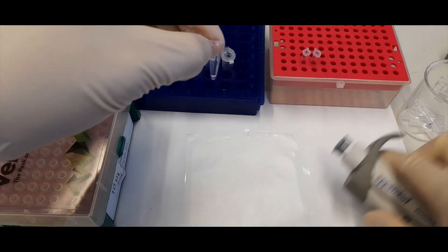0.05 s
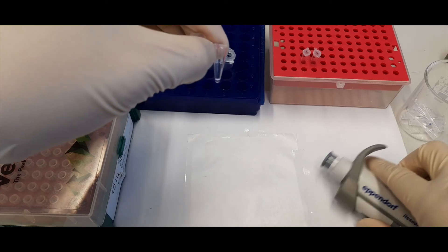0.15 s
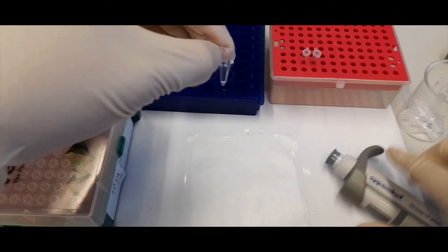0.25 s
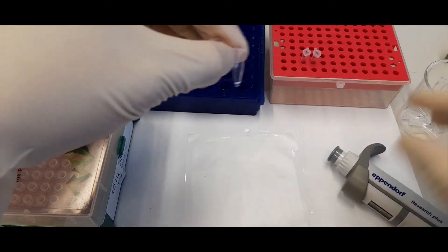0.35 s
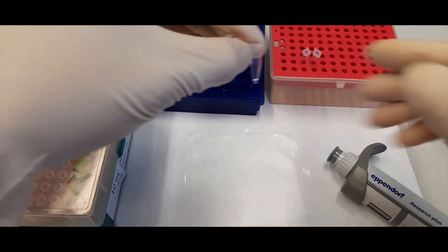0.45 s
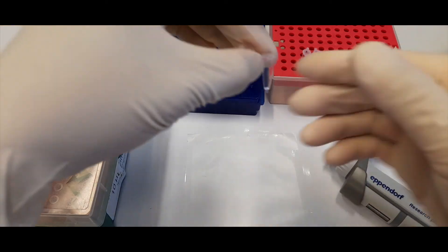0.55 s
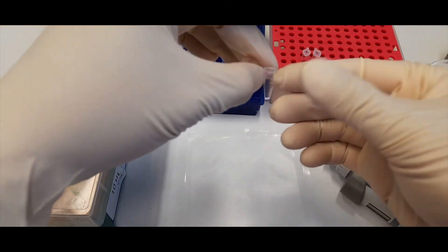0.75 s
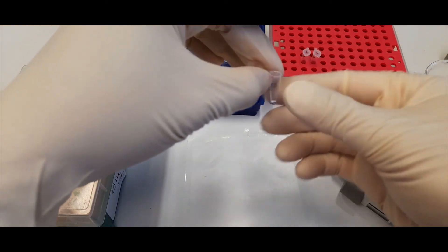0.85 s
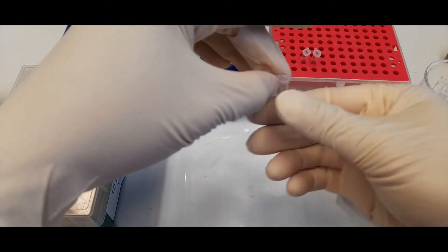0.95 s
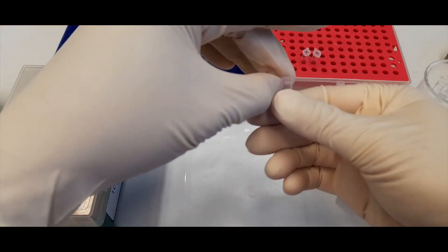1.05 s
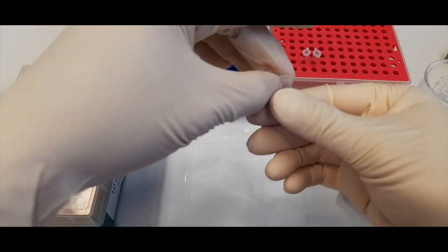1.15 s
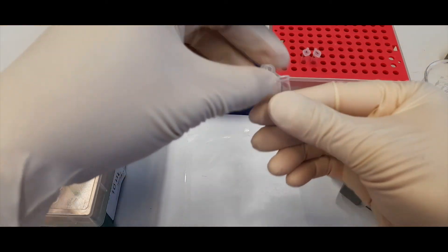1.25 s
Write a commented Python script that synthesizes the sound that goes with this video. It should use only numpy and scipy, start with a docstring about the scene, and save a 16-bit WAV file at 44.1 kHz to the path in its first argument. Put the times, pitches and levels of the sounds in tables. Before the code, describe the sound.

Close to the microphone, a plastic pipette taps a bench, tips onto its side and clacks with a hollow thump and slight rattle. Faint clicks from a small tube follow, while ventilation rushes softly in the small laboratory.

```python
"""A plastic pipette touches a laboratory bench close by, knocks, drops onto its side and clacks once more.
Each impact excites damped modes: the hollow barrel rings and the bench top thumps, while the loose
plunger rattles and a small room reverberates. Gloved fingers then handle a small plastic tube with
faint clicks. Under it all lies the steady, broadband rush of ventilation."""
import sys
import numpy as np
from scipy import signal
from scipy.fft import rfft, irfft, next_fast_len
from scipy.io import wavfile
from scipy.ndimage import map_coordinates

SR = 44100
rng = np.random.default_rng(int(sys.argv[2]) if len(sys.argv) > 2 else 0)


def store_wav(level_fs):
    """Save 16-bit WAV to argv[1]."""
    pcm = np.round(np.clip(np.atleast_2d(level_fs), -1, 1) * 32767)
    wavfile.write(sys.argv[1], SR, pcm.T.astype(np.int16))


N = 57330
T = np.arange(SR // 2) / SR  # time axis of one event, in seconds

# Pipette contacts. Each row: start in seconds, levels of clack, plunger rattle and barrel ring in dB,
# decay time of clack and rattle in seconds. Every decay time is for a fall of 60 dB.
CONTACT_EVENTS = [(0.1167, -34.5, -42, -66, 0.014), (0.1192, -46, -50, -44, 0.019),
                  (0.129, -53, -59, -46, 0.12), (0.142, -57.5, -52, -57, 0.043),
                  (0.1548, -45, -52, -44, 0.032), (0.2143, -35.5, -37.5, -37, 0.061),
                  (0.2192, -36, -31, -50, 0.044), (0.228, -37, -39, -52, 0.038),
                  (0.246, -46.5, -48, -50, 0.095), (0.2749, -23.5, -22.5, -19, 0.0144),
                  (0.2763, -18.5, -21, -16, 0.019), (0.2822, -49, -31, -42, 0.045),
                  (0.2922, -32, -36, -58, 0.073), (0.298, -29, -32.5, -43, 0.069),
                  (0.3024, -20, -27.5, -14.5, 0.019), (0.3053, -48, -26.5, -38, 0.017)]
# The handle's hard edge snaps against the bench. Each row: start in seconds, level in dB.
HANDLE_SNAPS = [(0.3015, -24.5)]
# Blows on the bench. Each row: start in seconds, levels of thump, hum and knock in dB.
BENCH_BLOWS = [(0.1192, -40, -62, -43.5), (0.1545, -38.5, -48.5, -75), (0.2146, -36, -30, -20.5),
               (0.2758, -20.5, -27, -27.5), (0.2914, -41, -30, -30.5), (0.3097, -32, -36.5, -26)]
# Finger clicks on the tube. Each row: start in seconds, level in dB, centre frequency in Hz,
# half-width in octaves, decay time in seconds.
TUBE_CLICKS = [(0.5102, -53.5, 1850, 0.28, .015), (0.7717, -39, 6560, 0.54, 0.0091),
               (0.807, -56, 2070, 0.22, .015), (1.0715, -63, 12100, 0.41, .03),
               (1.096, -64, 12100, .6, .06), (1.246, -50.5, 12100, 0.82, 0.0094),
               (1.2843, -54.5, 11000, 0.61, 0.012), (1.288, -64, 10000, 0.94, 0.098)]
# The hands meet softly. Each row: start in seconds, level in dB, frequency in Hz, length in seconds.
HAND_BUMPS = [(0.725, -38.5, 72.6, 0.055)]
# Envelope of the rubbing glove. Each row: time in seconds, level in dB.
GLOVE_ENVELOPE = [(0, -62.5), (.07, -69.5), (.1, -60.5), (.2, -64.5), (.7, -79), (.8, -66), (.9, -77),
                  (1.05, -88), (1.1, -73), (1.2, -77), (1.3, -69.5)]

# Normal modes. Each row: frequency in Hz, relative level in dB, decay time in seconds.
BARREL_MODES = [(894, -10.5, 0.032), (1031, -12.5, 0.017), (1380, -20, 0.026), (2260, -17.5, 0.045),
                (2890, -10, 0.019), (3094, -25, 0.066), (3130, -23, 0.069), (3170, -5, 0.016),
                (7250, -28, 0.18)]
HANDLE_MODES = [(4990, -1.5, 0.022), (5380, -2.5, 0.016)]
THUMP_MODES = [(81.7, -13, 0.36), (116, 4.5, 0.061), (156.3, -16, 0.23)]  # deep modes of the bench top
HUM_MODES = [(227.2, -6, 0.26), (278, -7, 0.48), (297.7, -1, 0.37)]  # its longer, hollow hum
KNOCK_MODES = [(340.2, -2.5, 0.099), (381.5, -3, 0.13), (505, -8, 0.044), (690.3, -13, 0.13),
               (800, -12.5, 0.059)]  # the pipette lying against the bench

# Noise spectra. Each row: frequency in Hz, relative spectral level in dB.
CLACK_SPECTRUM = [(200, 5.5), (600, 0), (950, 5), (1400, -1), (1850, -2.5), (2300, 3), (2650, 0.5),
                  (3200, 3), (3500, -2.5), (3750, -10.5), (4100, -2.5), (5000, -8.5), (6500, -6.5),
                  (15000, -37)]
RATTLE_SPECTRUM = [(800, -17), (3000, 2.5), (3700, -6), (4300, -3), (6000, -0.5), (7400, -0.5), (8800, 0.5),
                   (10500, -3.5), (12000, 1), (13600, -4.5), (14600, -4), (15500, -8.5)]
GLOVE_SPECTRUM = [(500, 0.5), (2500, -7), (6000, -5), (13000, -11.5), (16000, -14)]
ROOM_SPECTRUM = [(100, -4), (400, 1.5), (1000, 3.5), (1600, 8.5), (2500, -2), (3300, -0.5), (4200, 1.5),
                 (6000, -5), (14000, -8), (15800, -3.5)]
AIR_SPECTRUM = [(25, -27), (45, -3), (70, -5.5), (100, -3), (160, -4.5), (220, -6.5), (300, -6),
                (400, -15.5), (550, -13.5), (750, -15.5), (950, -26), (1400, -23.5), (1700, -33.5),
                (2200, -32.5), (3200, -46.5), (5000, -44), (9000, -47.5), (13000, -41), (15500, -43)]

# Likeness of the two channels. Each row: frequency in Hz, left-right correlation.
CONTACT_CORRELATION = [(300, 0.5), (1000, 0.27), (2500, 0.54), (4500, -0.43), (12000, 0.06)]
ROOM_CORRELATION = [(100, 0.64), (300, 0), (700, 0.12), (2000, 0.05), (12000, 0.05)]
AIR_CORRELATION = [(30, 0.97), (100, 0.84), (280, 0.94), (600, 0.64), (1500, 0.13), (10000, 0.091)]

# Reverberation of the room. Each row: frequency in Hz, decay time in seconds.
ROOM_DECAY = [(100, 0.5), (500, 0.28), (1400, 0.31), (2800, 0.26), (4500, 0.3), (12000, .33)]

CONTACT_ATTACK_S, KNOCK_ATTACK_S, THUMP_ATTACK_S = 0.0001, 0.0011, 0.0016
BARREL_LAG_S, BENCH_LAG_S = 0.00004, 0.00026  # phase delay on the right
CLACK_PAN_DB, BENCH_PAN_DB, AIR_PAN_DB = -1.5, -2, -1.5  # left minus right
PIPETTE_ROOM_DB, BENCH_ROOM_DB, HAND_ROOM_DB = -6.5, -8.5, -8  # reverberation relative to direct sound


def pipette():
    """Impact excitation: each contact makes the barrel clack and ring and the loose plunger rattle."""
    out = np.zeros((2, N))
    barrel = ring(BARREL_MODES, CONTACT_ATTACK_S, BARREL_LAG_S)
    for start, clack_db, rattle_db, ring_db, t60 in CONTACT_EVENTS:
        burst = decay(t60, CONTACT_ATTACK_S)
        clack = amp(clack_db) * burst * noise(CLACK_SPECTRUM, CONTACT_CORRELATION)
        rattle = amp(rattle_db) * burst * noise(RATTLE_SPECTRUM, CONTACT_CORRELATION)
        contact = pan(CLACK_PAN_DB) * (clack + amp(ring_db) * barrel) + rattle
        add(out, start, contact)
        # each contact gets a fresh random room tail, for smoother reverberation
        add(out, start, amp(PIPETTE_ROOM_DB) * room(contact))
    for start, db in HANDLE_SNAPS:
        add(out, start, amp(db) * ring(HANDLE_MODES, CONTACT_ATTACK_S, BARREL_LAG_S))
    return out


def bench():
    """Free vibration of a struck plate: the pipette's weight sets off a thump, a hum and a knock."""
    out = np.zeros((2, N))
    for start, thump_db, hum_db, knock_db in BENCH_BLOWS:
        hum = amp(hum_db) * ring(HUM_MODES, KNOCK_ATTACK_S, BENCH_LAG_S, waver_rad=1)
        knock = amp(knock_db) * ring(KNOCK_MODES, KNOCK_ATTACK_S, BENCH_LAG_S)
        thump = amp(thump_db) * ring(THUMP_MODES, THUMP_ATTACK_S, BENCH_LAG_S)
        add(out, start, -(thump + hum + knock))  # negative: the top is pushed down
    return pan(BENCH_PAN_DB) * (out + amp(BENCH_ROOM_DB) * room(out))


def hands():
    """Light impacts: the tube clicks in bursts of band noise and the hands meet in a low pulse."""
    out = np.zeros((2, N))
    hz = np.geomspace(100, 20000, 80)
    for start, db, centre_hz, octaves, t60 in TUBE_CLICKS:
        band_db = -20 * np.log10(1 + (np.log2(hz / centre_hz) / octaves) ** 2)
        band = noise(np.column_stack([hz, band_db]), CONTACT_CORRELATION)
        add(out, start, amp(db) * decay(t60, CONTACT_ATTACK_S) * band)
    for start, db, bump_hz, length in HAND_BUMPS:
        arch = np.sin(np.pi * np.minimum(T / length, 1))
        add(out, start, amp(db) * arch * np.sin(2 * np.pi * bump_hz * T))
    return out + amp(HAND_ROOM_DB) * room(out)


def gloves():
    """Friction noise: the rubbing of the gloves swells and fades."""
    level_db = np.interp(np.arange(N) / SR, *np.transpose(GLOVE_ENVELOPE))
    return amp(level_db) * noise(GLOVE_SPECTRUM, CONTACT_CORRELATION, N)


def room(sound, onset_s=0.0046):
    """Diffuse reverberation: convolution with a noise tail in which the bass lasts longest."""
    hz, t, bands = signal.stft(noise(ROOM_SPECTRUM, ROOM_CORRELATION), SR, nperseg=256)
    damping = np.exp(-np.log(1000) * t / along(ROOM_DECAY, hz)[:, None])
    tail = signal.istft(bands * damping, SR, nperseg=256)[1][:, :len(T)]
    tail *= 1 - np.exp(-(T / onset_s) ** 2)
    return signal.fftconvolve(sound[:1], tail / np.linalg.norm(tail[0]), axes=1)[:, :N]


def ventilation(gain_db=-48.5):
    """Stationary noise: a low rush of air with a faint hiss above it."""
    return amp(gain_db) * pan(AIR_PAN_DB) * noise(AIR_SPECTRUM, AIR_CORRELATION, N)


def ring(modes, attack_s, lag_s, waver_rad=0):
    """Modal superposition: damped sinusoids start together, neighbours with opposite signs."""
    out = np.zeros((2, len(T)))
    stereo_time = np.array([T, T - lag_s])
    for k, (hz, db, t60) in enumerate(modes):
        phase = 2 * np.pi * hz * stereo_time + waver_rad * waver()
        out += (-1) ** k * amp(db) * decay(t60, attack_s) * np.sin(phase)
    return out


def waver(knots_per_s=35):
    """Random modulation: a smooth curve through Gaussian values."""
    return map_coordinates(rng.standard_normal(size=64), [T * knots_per_s], mode="mirror")


def noise(spectrum, correlation, size=len(T)):
    """Spectral shaping: stereo noise of rms 1, whose mid-side balance sets the correlation."""
    hz = np.fft.rfftfreq(size, 1 / SR)
    angle = np.arccos(np.clip(along(correlation, hz), -1, 1)) / 2
    shaped = rfft(rng.standard_normal((2, size))) * amp(along(spectrum, hz))
    mid, side = irfft(shaped * [np.cos(angle), np.sin(angle)], size)
    stereo = np.array([mid + side, mid - side])
    return stereo / np.sqrt(np.mean(stereo ** 2) + 1e-20)


def decay(t60, attack_s):
    """Exponential damping: after a quick rise, a fall of 60 dB every t60 seconds."""
    return np.exp(-np.log(1000) * T / t60) * (1 - np.exp(-T / attack_s))


def along(points, hz):
    """Interpolation on a logarithmic frequency axis."""
    knots_hz, values = np.transpose(points)
    return np.interp(np.log(hz + 1), np.log(knots_hz + 1), values)


def amp(db):
    """Amplitude ratio of a level in decibels."""
    return 10 ** (np.asarray(db) / 20)


def pan(db):
    """Direction by level difference: left and right gains."""
    return amp([[db / 2], [-db / 2]])


def add(track, start, sound):
    """Superposition of a sound on a track, from a start in seconds."""
    part = track[:, round(start * SR):][:, :sound.shape[-1]]
    part += sound[..., :part.shape[1]]


def scene():
    """Linear superposition: the pressures of all sources add."""
    return pipette() + bench() + hands() + gloves() + ventilation()


def record(dry, low_cut_hz=66, top_hz=15800):
    """Band limiting: filters weaken the lowest rumble and remove the highest treble."""
    highpass = signal.butter(2, low_cut_hz, "highpass", fs=SR, output="sos")
    size = next_fast_len(N + SR // 2)
    spectrum = rfft(signal.sosfilt(highpass, dry), size)
    passband = np.fft.rfftfreq(size, 1 / SR) < top_hz
    return irfft(spectrum * passband, size)[:, :N]


dry = scene()
out = record(dry)
store_wav(out)
```